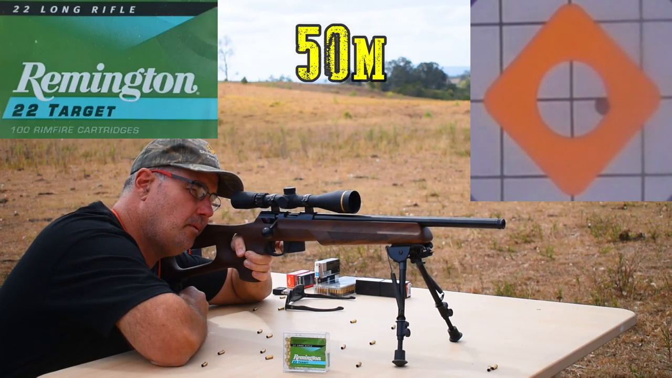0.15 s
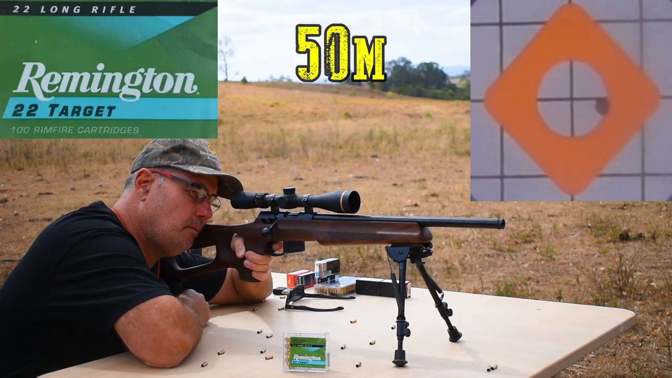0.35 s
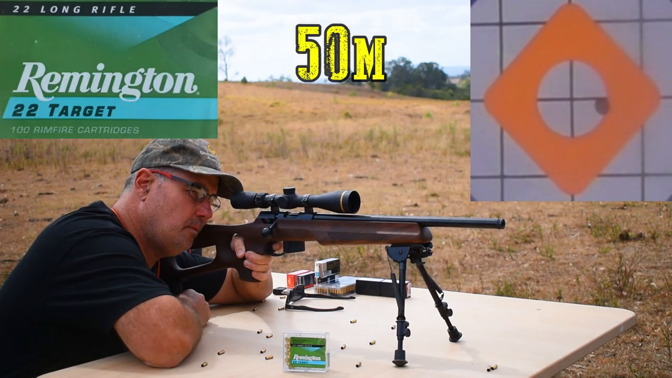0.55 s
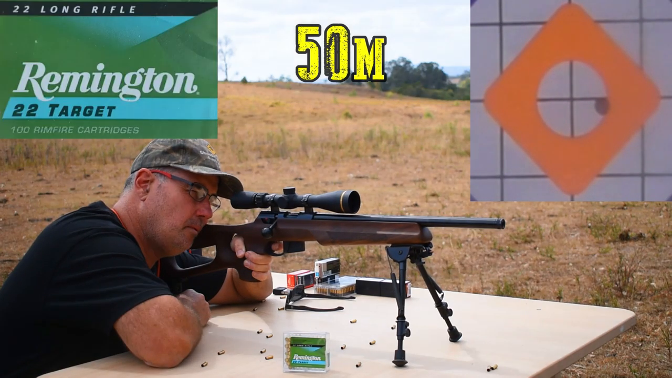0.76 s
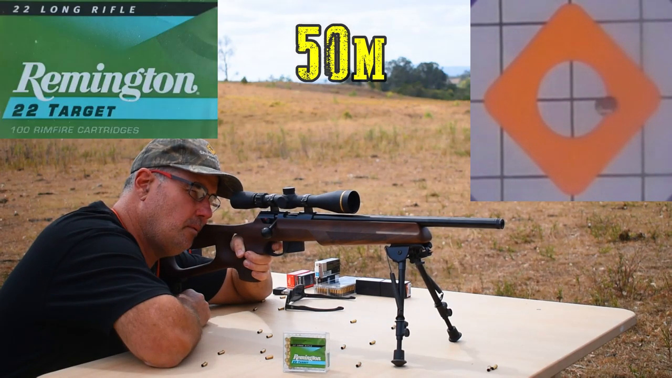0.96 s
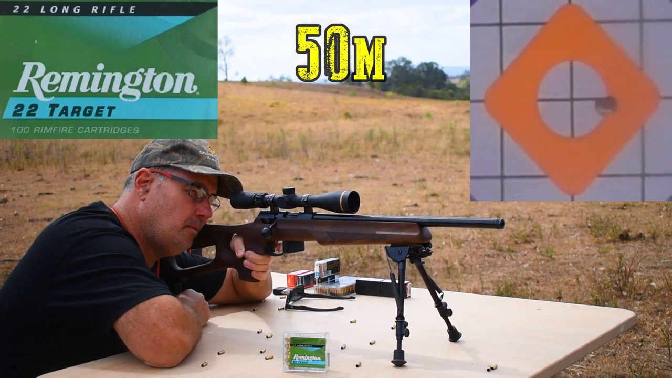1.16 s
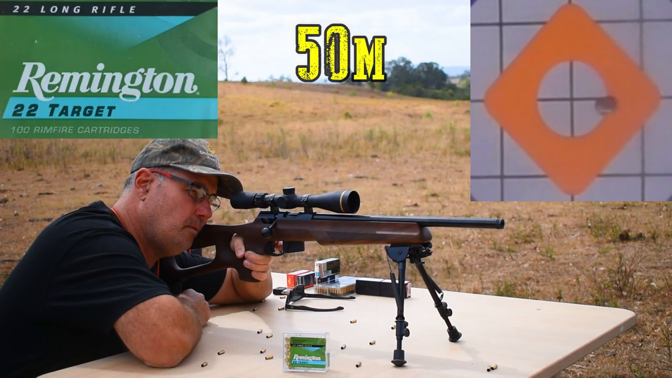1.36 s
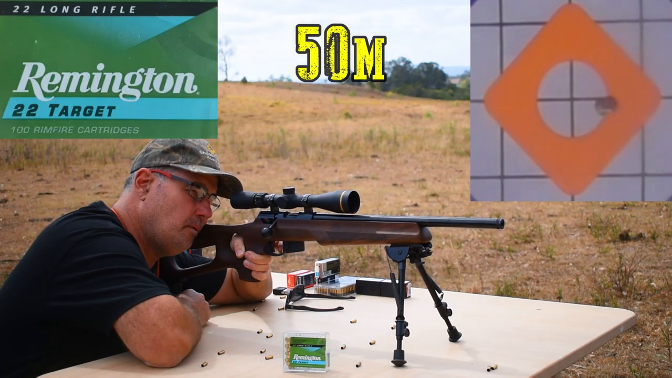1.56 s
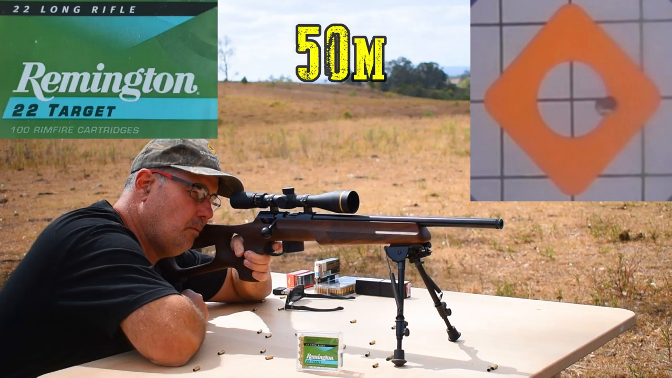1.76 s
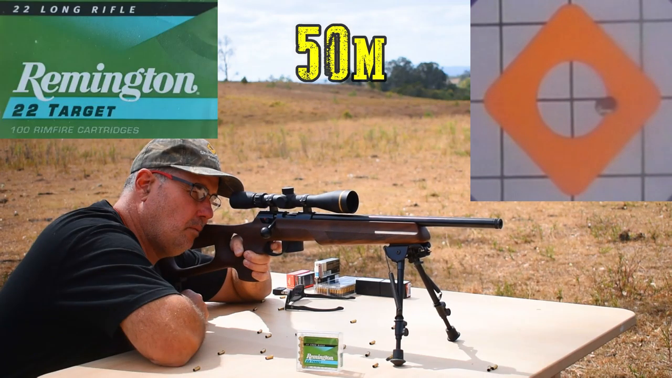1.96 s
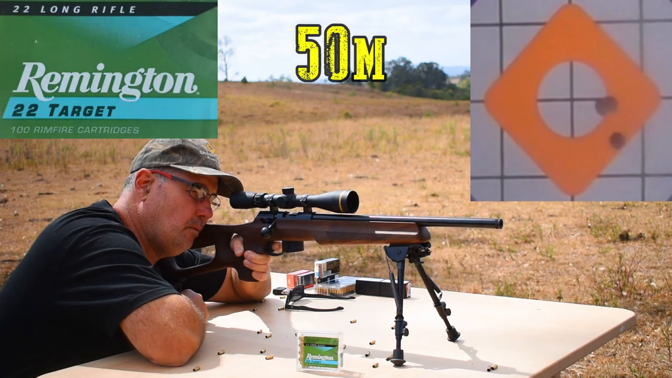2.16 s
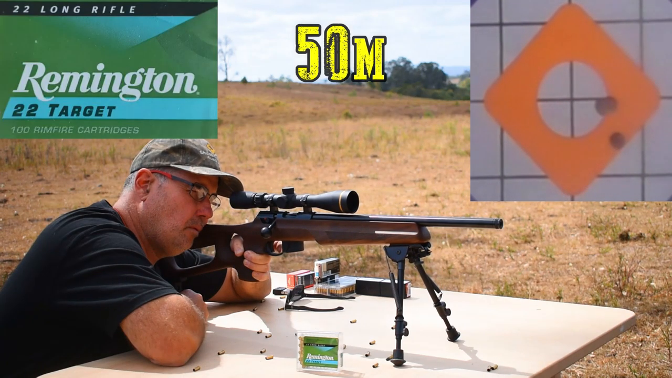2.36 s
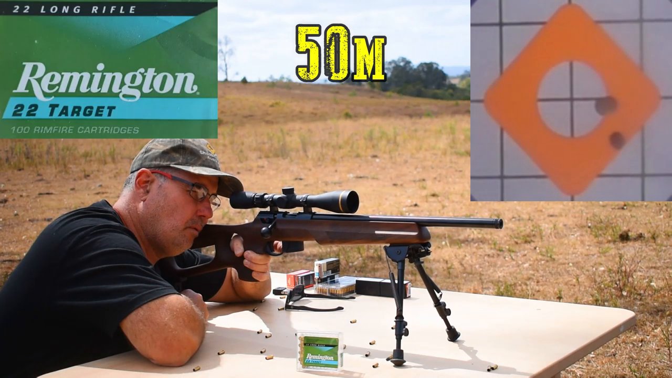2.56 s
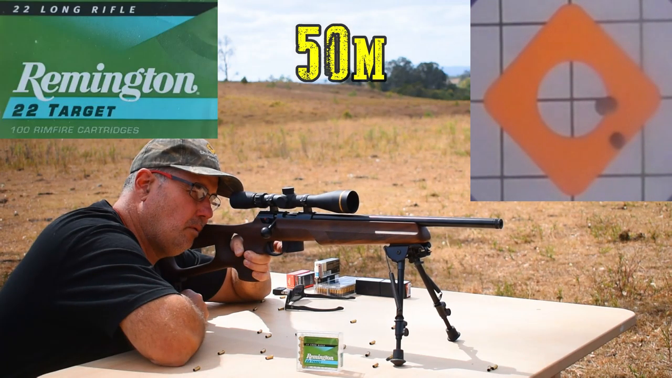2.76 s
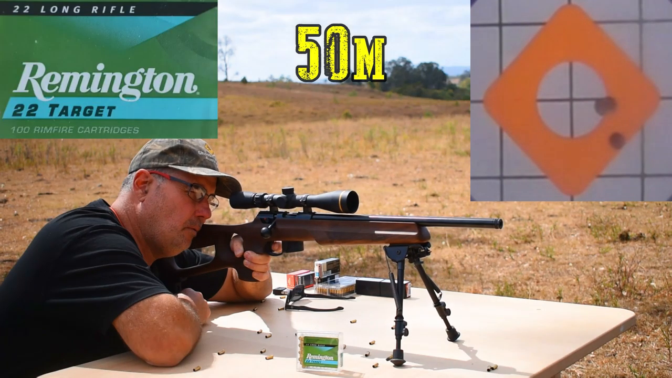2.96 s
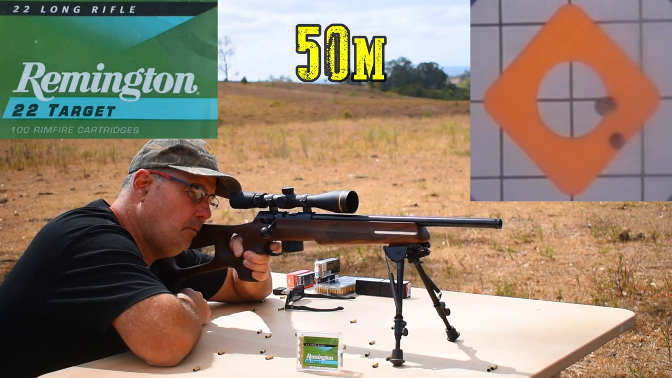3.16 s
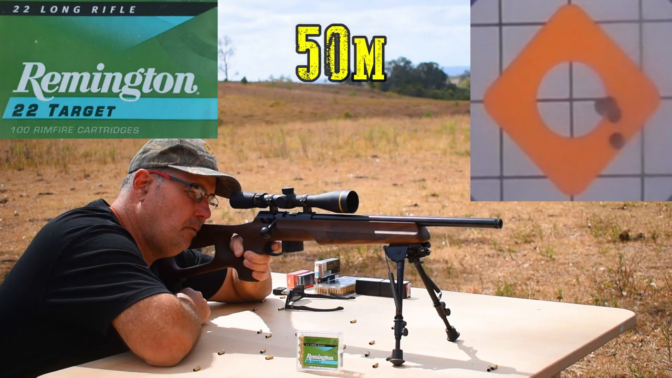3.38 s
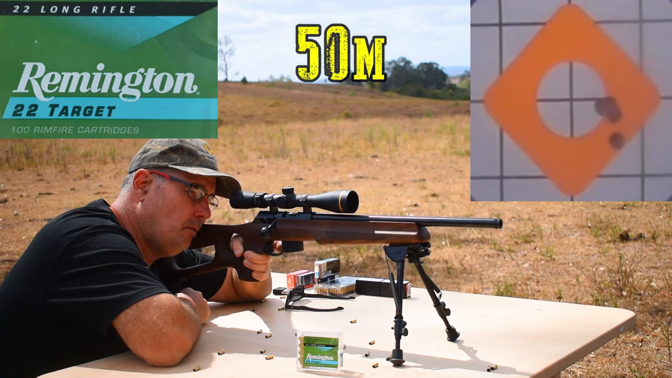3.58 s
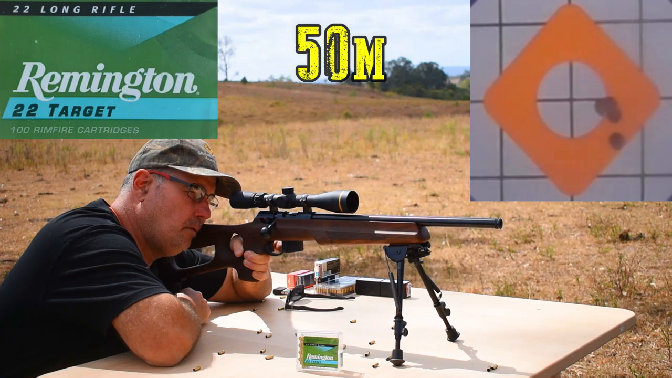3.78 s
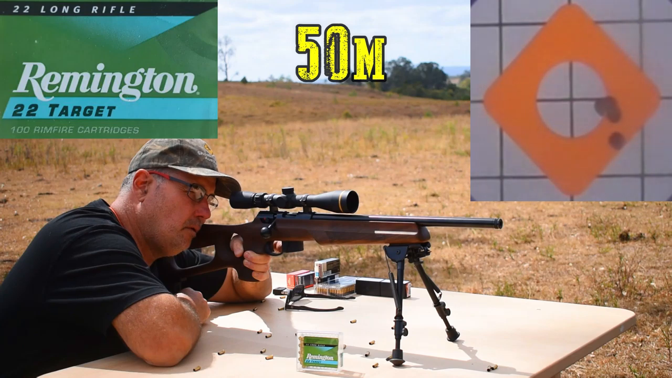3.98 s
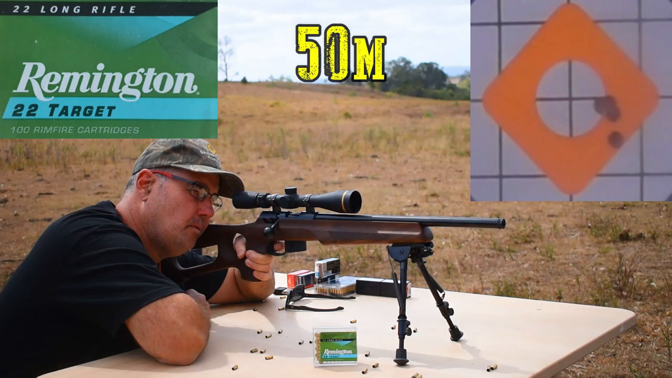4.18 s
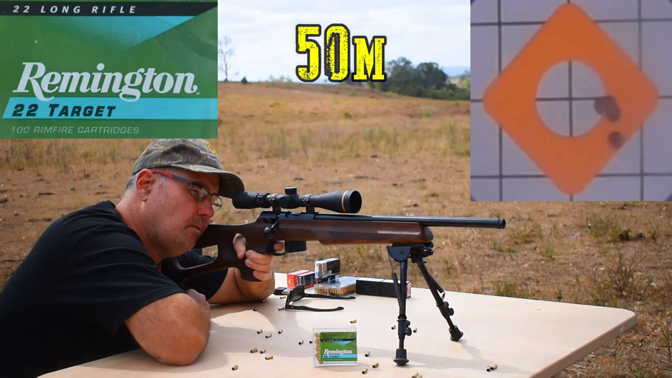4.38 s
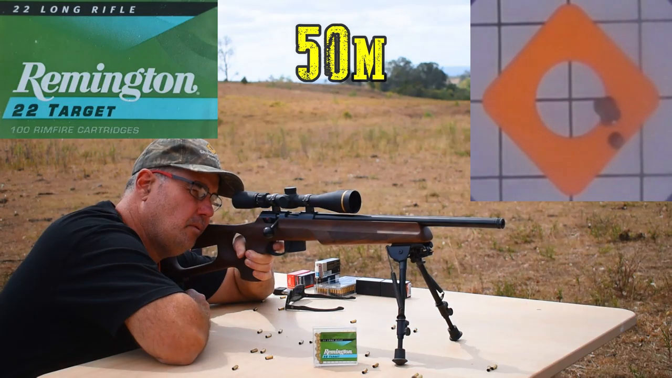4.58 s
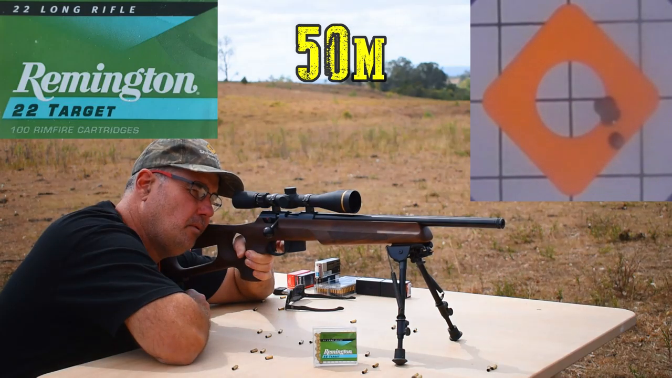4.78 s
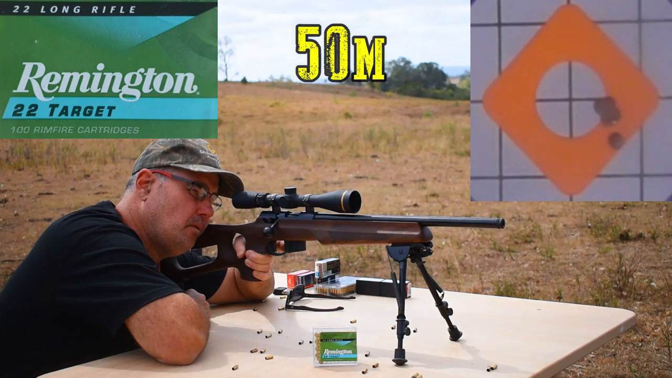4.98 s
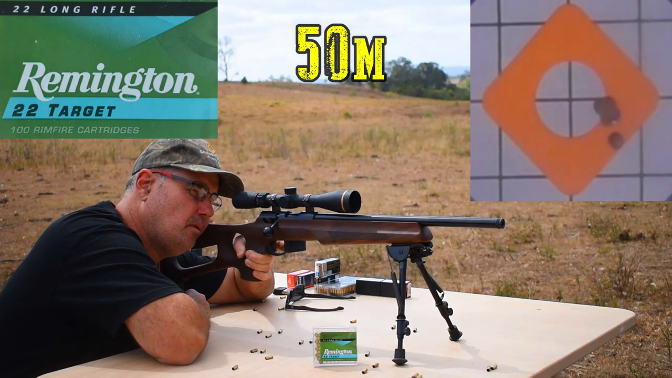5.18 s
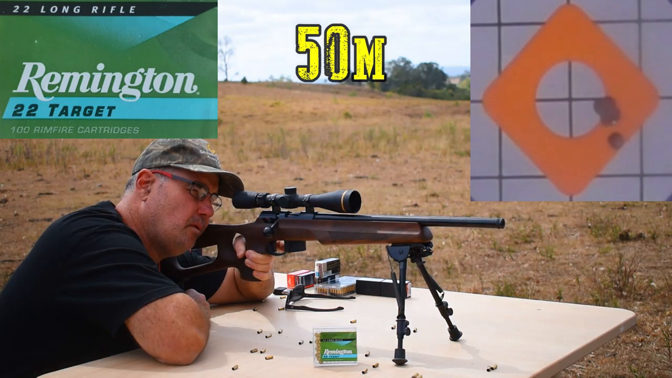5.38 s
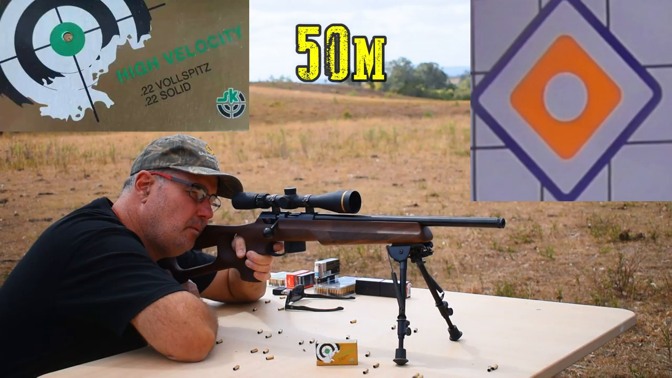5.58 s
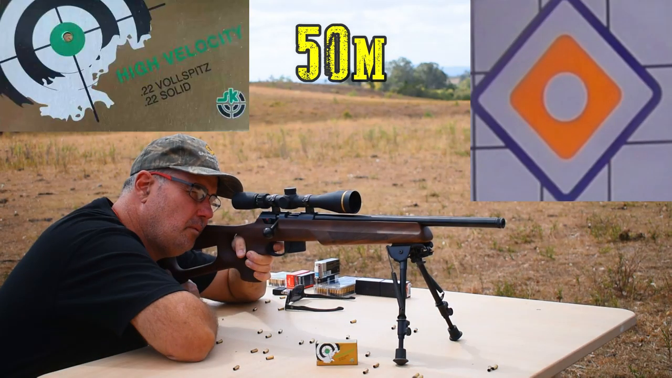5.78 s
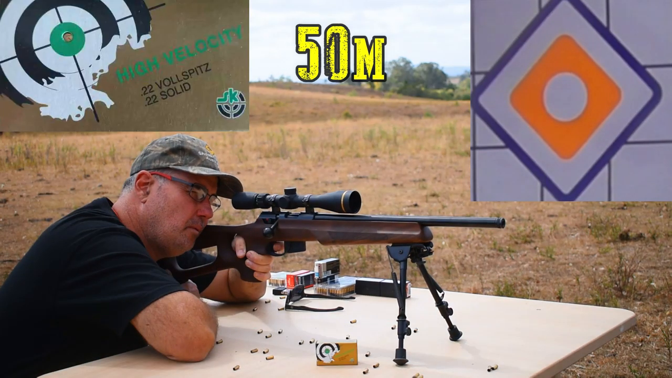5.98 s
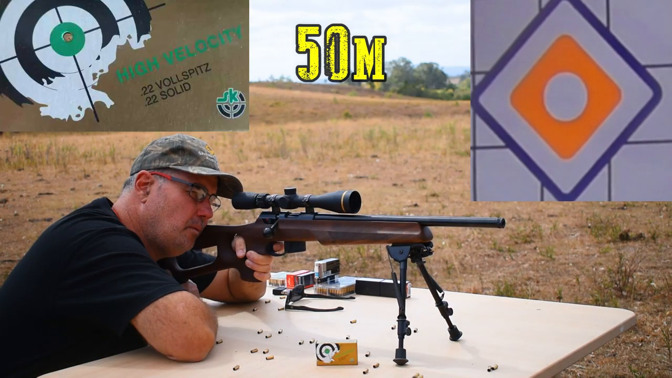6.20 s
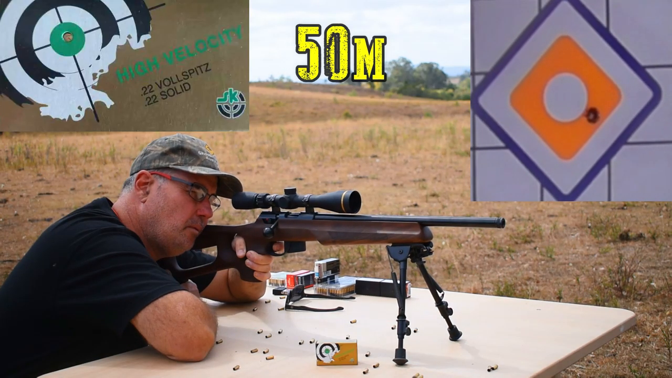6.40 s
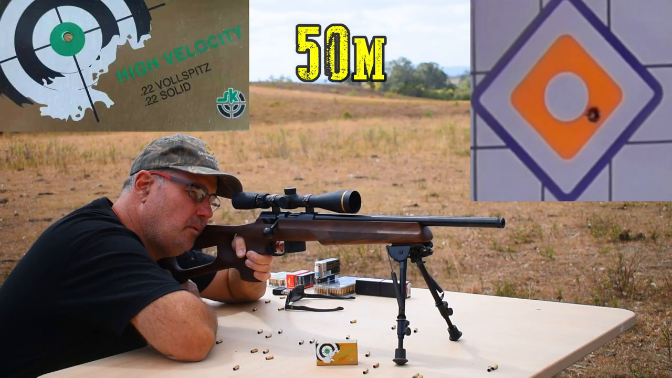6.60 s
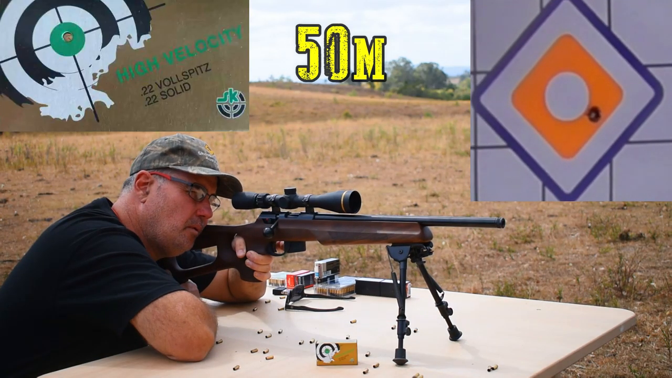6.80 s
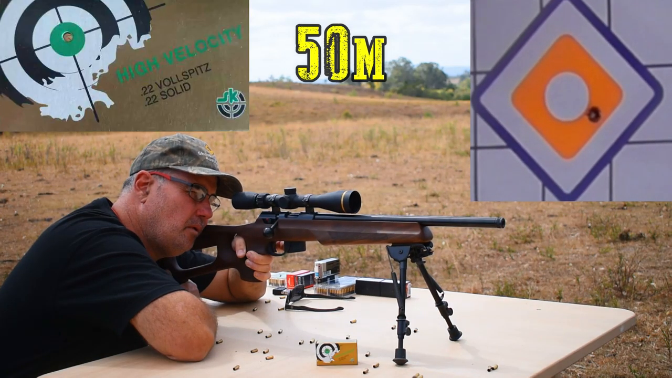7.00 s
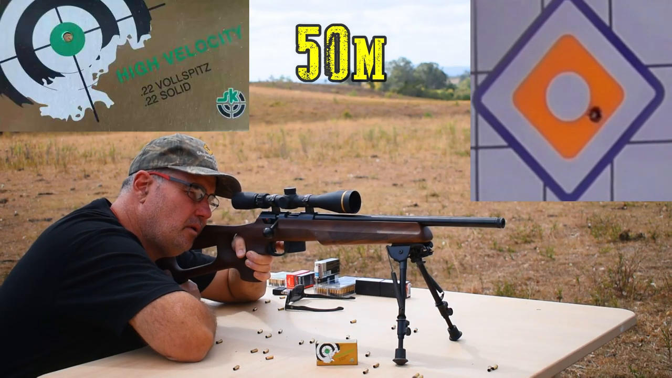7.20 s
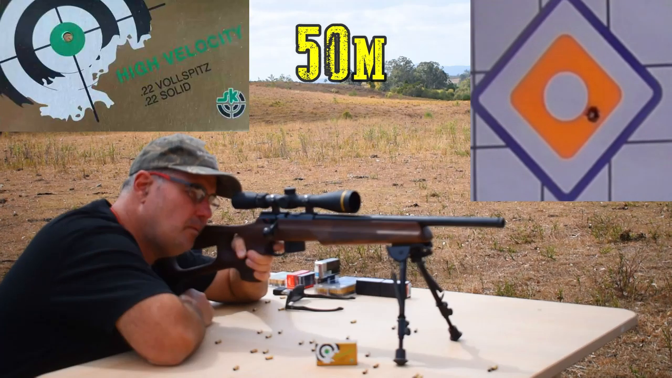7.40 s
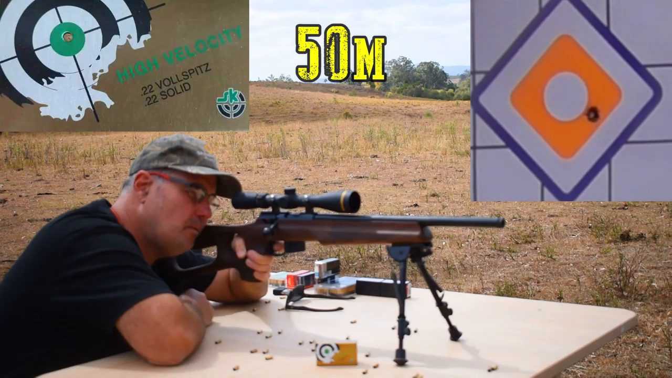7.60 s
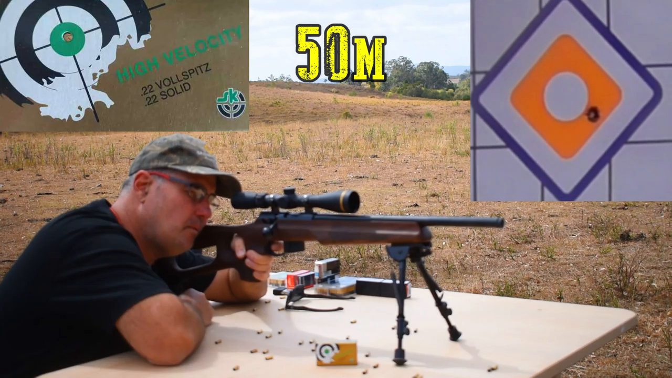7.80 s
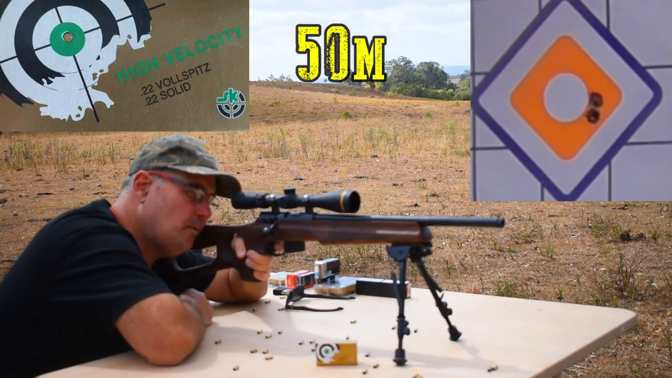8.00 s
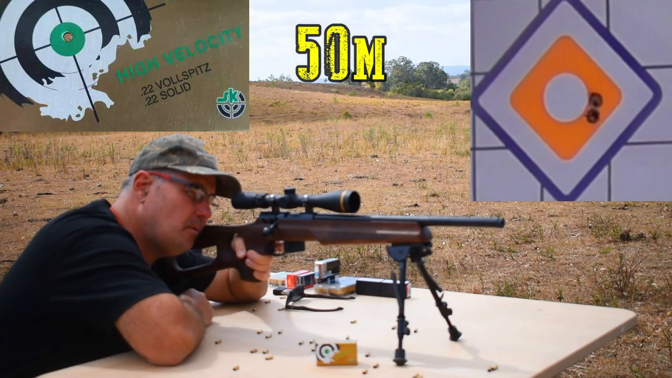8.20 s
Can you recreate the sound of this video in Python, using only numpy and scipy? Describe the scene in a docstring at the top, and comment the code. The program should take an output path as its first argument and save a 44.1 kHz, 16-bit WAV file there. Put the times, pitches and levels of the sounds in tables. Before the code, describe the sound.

Evenly spaced light rifle cracks overload a close microphone outdoors, each followed by clattering slapback from ground and banks, with near silence between.

```python
"""An open outdoor range: a small-bore rifle fires six single shots from a bench while the echo of an earlier
shot is still dying away. Each crack, a noise burst, overloads the microphone: it swings at a low pitch, a cosine
in log time, and is nearly deaf for a few hundredths of a second. Filtered noise then gives the scatter of ground,
banks and trees, and smeared pulses the hard slaps. Faint bird whistles, ticks and open-air noise lie beneath."""
import sys
import numpy as np
from scipy import signal
from scipy.io import wavfile
from scipy.ndimage import uniform_filter1d

SR = 44100
rng = np.random.default_rng(int(sys.argv[2]) if len(sys.argv) > 2 else 0)


def materialize(psi):
    """Save the field psi as 16-bit PCM at rate SR to the path in sys.argv[1].

    A 1-D psi becomes a single channel; in a 2-D psi each row is a channel.
    """
    bounded = np.clip(np.atleast_2d(psi).T, -1, 1)
    quanta = np.round(bounded * 32767).astype(np.int16)
    wavfile.write(sys.argv[1], SR, quanta)


N = 363825
T = np.arange(int(1.2 * SR)) / SR  # time after one shot, s
GROUND_START_S = 0.061  # the open ground begins to answer

# distinct hard reflections: [delay t/s, level/dB, smear t/s]
REFLECTIONS = [(0.066, -25.5, .00063), (0.0842, -20.5, .00066), (.1123, -10, .001), (.1162, -16, .001),
               (.1408, -17.5, .0008), (.1462, -7, .001), (.1627, -16, .001), (.2220, -20.5, .0012),
               (0.4877, -28, 0.00293), (0.721, -55, 0.00214), (.7855, -39.5, .0036), (0.8307, -40.5, 0.003)]
# spectrum of the report, also heard in nearby ground and ticks: [f/Hz, level/dB]
CRACK_SPECTRUM = [(60, -2.5), (200, -0.5), (350, -5), (520, 0.5), (850, -9.5), (1550, -0.5), (2400, -10.5),
                  (3500, -9.5), (6000, -17.5), (9000, -24.5), (15500, -39)]
# spectrum of a hard surface's slap before air absorption: [f/Hz, level/dB]
SLAP_SPECTRUM = [(60, -16), (400, -13.5), (900, -7), (1450, 4), (2100, -2), (3200, -19.5), (6000, -24.5),
                 (10000, -46.5), (15500, -53)]


def amp(db):
    """Level definition: decibels to amplitude ratio."""
    return 10 ** (np.asarray(db) / 20)


def read(points, hz):
    """Log-frequency interpolation: the level of a spectrum at any frequency."""
    f, db = np.transpose(points)
    return np.interp(np.log(hz + 1), np.log(f + 1), db)


def add(mix, s, sound):
    """Superposition: adds a sound to the mix at time s, trimmed at both ends of the mix."""
    start = round(s * SR)
    sound = sound[max(-start, 0):]
    part = mix[max(start, 0):][:len(sound)]
    part += sound[:len(part)]


def colour(x, points, size=4096):
    """Minimum-phase filtering: a causal filter of unit energy, its phase the Hilbert pair of its log gain."""
    hz = abs(np.fft.fftfreq(size, 1 / SR))
    log_gain = np.log(amp(read(points, hz)))
    response = np.exp(np.conj(signal.hilbert(log_gain)))
    taps = np.fft.ifft(response).real[:size // 2]
    return signal.oaconvolve(x, taps / np.linalg.norm(taps))[:len(x)]


def burst(points, smear, rough, size=2048):
    """Rough-surface reflection: a coloured pressure pulse plus a share of noise smeared in time."""
    t = np.arange(size) / SR
    smeared = rng.standard_normal(size) * (t / smear) * np.exp(-(t / smear) ** 2)
    clean = np.arange(size) == int(.5 * smear * SR)
    pulse = colour(clean + rough * smeared, points)
    # the energy of 2 ms at level 1
    return pulse / np.linalg.norm(pulse) * np.sqrt(.002 * SR)


def rifle(steady=.7, board_db=-23, deaf_db=-29, recovery=0.0005, lead=0.0013):
    """Impulse excitation: each shot wakes the same reflectors; moving air varies their echo a little."""
    # one row per shot: [t/s, crack level/dB, thump level/dB, thump duration factor, deaf time t/s,
    #  bench level/dB, echo level/dB, echo brightness/dB, backstop level/dB, far slap level/dB,
    #  ground comb spacing f/Hz, bullet flight t/s]
    shot_table = [(-.387, -12, -4, .87, .03, -4, -2.5, 2.5, 0, -33.5, 2160, 0.18),
                  (.8385, -18.5, -3.5, .92, .0245, 0, 0, 1, -3, -26, 2130, 0.16),
                  (2.014, -16.5, -5.5, 0.93, 0.035, -4, -0.95, .5, -1.5, -21.5, 2130, 0.16),
                  (3.2305, -18.5, 2, 0.98, 0.033, -1.5, 0, 1, -1.5, -23.5, 2140, .15),
                  (4.4912, -19.5, -1.5, 1.04, .038, -3.5, -0.9, 1.5, -1, -29, 2100, .15),
                  (6.3119, -17, 2.5, 1.1, 0.01356, 6, 2, 4.5, 6, -16.5, 1990, 0.15),
                  (7.8329, -18, 2.5, 1.02, 0.027, 5, 3.5, 3.5, 5, -15, 1980, 0.15)]
    # moment when each shot's echo stops short: [t/s]
    stop_times = [.39, 1.71, 2.915, 4.16, 5.46, 7.39, 8.5]
    # spectrum of the bullet's snap through the target: [f/Hz, level/dB]
    board_spectrum = [(300, -20.5), (2000, -6), (4500, 5.5), (6700, 6), (8500, -12.5), (11000, -9.5),
                      (15500, -21)]
    far_slap_s, headroom, fade_s = .3786, .66, .004

    out = np.zeros(N)
    terrain = reflectors()
    hard = slaps()
    for shot, stop in zip(shot_table, stop_times):
        (s, crack_db, thump_db, slow, deaf, bench_db, echo_db, bright_db,
         backstop_db, far_db, comb_hz, flight) = shot
        # steady is the share of echo power common to all shots
        taps = np.sqrt(steady) * terrain + np.sqrt(1 - steady) * reflectors()
        echo = amp(echo_db) * scatter(taps, bright_db, backstop_db, comb_hz)
        echo += amp(bench_db) * bench() + hard
        far_slap = burst(SLAP_SPECTRUM, smear=.0012, rough=.35)
        add(echo, far_slap_s, amp(far_db) * far_slap)
        target_snap = burst(board_spectrum, smear=0.0018, rough=1.0)
        add(echo, flight, amp(board_db) * target_snap)
        # soft saturation rounds off the loudest slaps
        echo /= (1 + (echo / headroom) ** 4) ** .25
        awake = (1 + np.tanh((T - deaf) / recovery)) / 2
        echo *= amp(deaf_db * (1 - awake))
        echo *= np.clip((stop - s - T) / fade_s, 0, 1)
        add(out, s - lead, amp(crack_db) * crack())
        add(out, s, amp(thump_db) * thump(slow) + echo)
        add(out, s + deaf, rebound())
    return out


def crack(rise_db=13, length=0.0081, onset=.001):
    """Blast noise: the report builds for a few milliseconds until the microphone blocks."""
    growth = amp(rise_db * (np.minimum(T / length, 1) - 1))
    start = 1 - np.exp(-T / onset)
    block = 1 + (T / length) ** 20
    sound = colour(rng.standard_normal(len(T)) * growth * start / block, CRACK_SPECTRUM)
    return sound / np.linalg.norm(sound) * np.sqrt(length * SR)


def thump(slow, first_peak=.0071, stretch=1.673, crest=0.012, width=0.59, db=-5.5, linger=0.073, onset=0.0071):
    """Overload recovery: the microphone swings to rest, each half swing longer than the last by stretch."""
    # slow stretches every time below; width is in natural-log units of time
    t = np.maximum(T / slow, 1 / SR)
    age = np.log(t / crest)
    main = np.exp(-(age / width) ** 2 / 2)
    late = linger * np.exp(-(age - 1) ** 2 / 0.2)
    size = (main + late) / (1 + (onset / t) ** 20)
    swing = np.cos(np.pi * np.log(t / first_peak) / np.log(stretch))
    return amp(db) * size * swing


def rebound(db=-13, swing_hz=68, decay=0.0063, onset=0.00072):
    """Damped oscillation: a smaller low swing as the microphone comes back to life."""
    envelope = np.exp(-T / decay) * (1 - np.exp(-(T / onset) ** 2))
    return amp(db) * np.cos(2 * np.pi * swing_hz * T) * envelope


def bench(db=-7.0, t60=.11, ground_db=-29, ground_t60=0.15):
    """Exponential decay: the table dies fast, the nearby ground rings on a little with more treble."""
    # spectrum of the table's reflections: [f/Hz, level/dB]
    bench_spectrum = [(60, -11.5), (190, -2), (260, -8.5), (335, -1.5), (420, -6.5), (520, 7), (640, -9),
                      (790, -4), (1100, -9), (1500, -11), (2800, -15), (5200, -18.5), (8000, -31),
                      (15500, -42.5)]
    table, near_ground = rng.standard_normal((2, len(T)))
    table = colour(table, bench_spectrum) * amp(db - 60 * T / t60)
    near_ground = colour(near_ground, CRACK_SPECTRUM) * amp(ground_db - 60 * T / ground_t60)
    return table + near_ground


def slaps(bounce=.00066, bounce_share=0.61):
    """Specular reflection: hard surfaces send back short slaps, each doubled by its bounce off the ground."""
    out = np.zeros(len(T))
    for delay, db, smear in REFLECTIONS:
        slap = burst(far(SLAP_SPECTRUM, delay), smear, rough=.2)
        slap *= amp(db) / (1 + bounce_share)
        add(out, delay, slap)
        add(out, delay + bounce, bounce_share * slap)
    return out


def far(points, delay, loss_db=30):
    """Air absorption, growing as frequency squared up to 10.5 kHz: loss_db per second of delay at 7 kHz."""
    return [(hz, db - loss_db * delay * min(hz / 7000, 1.5) ** 2) for hz, db in points]


def reflectors(lumpy_db=3, size=90):
    """Random scattering: countless small reflectors in clumps that crackle but even out over longer stretches."""
    clumps = uniform_filter1d(rng.standard_normal(len(T)), size) * np.sqrt(size)
    taps = rng.standard_normal(len(T)) * amp(lumpy_db * np.clip(clumps, -2, 2))
    return taps / np.sqrt(uniform_filter1d(taps ** 2, size=600))


def scatter(taps, bright_db, backstop_db, comb_hz, db=1.0, air_db=26, hinge_hz=2700, soil_db=5, soil_hz=650,
            comb_db=8, comb_s=0.49, comb_width=0.063, leaves_hz=2450, leaves_db=6, leaves_s=0.7, leaves_width=0.071):
    """Diffuse reflection: the range's echo, coloured by what it met and dulled by the air with distance."""
    # spectrum of the diffuse echo before these effects: [f/Hz, level/dB]
    ground_spectrum = [(80, -4.5), (270, -7.5), (450, -3.5), (570, -9.5), (720, -2), (920, -6),
                       (1400, -1.5), (2200, -4.5), (2850, -11.5), (3700, -16.5), (5600, -20.5), (7500, -29),
                       (10500, -36.5), (15500, -44.5)]
    gain, treble_db = terrain_echo(backstop_db)
    hz, t, z = signal.stft(colour(taps, ground_spectrum), SR, nperseg=256)
    hz = hz[:, None]
    shelf = (bright_db + np.interp(t, T, treble_db)) * hz ** 4 / (hz ** 4 + hinge_hz ** 4)
    # air takes the treble, soft soil the lower middle; both losses grow per second
    air_loss = air_db * np.clip((hz - 5500) / 5000, 0, 2)
    soil_loss = soil_db * np.exp(-((hz - soil_hz) / 500) ** 2)
    absorbed = t * (air_loss + soil_loss)
    # a bounce off the ground combs the return from one far bank
    comb_band = (hz > 2710) * (hz < 7050)
    comb_time = np.exp(-((t - comb_s) / comb_width) ** 2)
    comb = comb_db * np.cos(2 * np.pi * hz / comb_hz) * comb_band * comb_time
    # the tree line beyond it answers mostly in the upper middle
    leaves = leaves_db * np.exp(-((hz - leaves_hz) / 600) ** 2 - ((t - leaves_s) / leaves_width) ** 2)
    z = z * amp(shelf - absorbed + comb + leaves)
    sound = signal.istft(z, SR, nperseg=256)[1][:len(T)]
    return sound * amp(db) * gain * flutter()


def terrain_echo(backstop_db, near_s=0.031, near_db=-25, near_spread=.012, near_treble_db=-14):
    """Incoherent power addition: earth by the bench, open ground, banks and far country; gain and treble dB."""
    # earth banks and stands of trees, each a soft echo: [delay t/s, level/dB, spread t/s, treble level/dB]
    bank_table = [(0.266, -32, .018, -22), (0.357, -38, 0.004, 7.5), (0.385, -35, 0.016, -4),
                  (0.468, -47.5, 0.024, 5.5), (0.488, -38.5, 0.027, -9), (.622, -46, 0.018, -7),
                  (0.832, -48.5, 0.05, -17)]
    # the open ground is brightest where it is nearest
    ground_treble_db, extra_treble_db, bright_s = -2, 22, .026
    # the countryside beyond keeps up a faint, slowly fading wash
    distant_s, wash_db, wash_fall_db_per_s, wash_treble_db = 0.38, -56.5, 2.5, -5.5
    # rough earth round each hard surface scatters a little of its slap
    skirt_db, skirt_lag_s, skirt_spread_s, skirt_treble_db = -7, .002, .006, -7.5
    # the banks round the backstop answer each shot with their own strength
    backstop_s, backstop_spread_s = 0.31, 0.22

    distant = 1 / (1 + (distant_s / (T + 1e-6)) ** 20)
    backstop_time = np.exp(-((T - backstop_s) / backstop_spread_s) ** 2)
    backstop = amp(backstop_db * distant * backstop_time)
    nearness = np.exp(-np.maximum(T - GROUND_START_S, 0) / bright_s)
    wash = distant * amp(wash_db - wash_fall_db_per_s * (T - distant_s))
    parts = [(patch(near_s, near_db, near_spread), near_treble_db),
             (ground(), ground_treble_db + extra_treble_db * nearness),
             (wash, wash_treble_db)]
    for delay, db, spread, treble_db in bank_table:
        parts.append((backstop * patch(delay, db, spread), treble_db))
    for delay, db, _ in REFLECTIONS:
        parts.append((patch(delay + skirt_lag_s, db + skirt_db, skirt_spread_s), skirt_treble_db))
    body = sum(gain ** 2 for gain, _ in parts)
    treble = sum((gain * amp(treble_db)) ** 2 for gain, treble_db in parts)
    return np.sqrt(body), 10 * np.log10(treble / body)


def ground(peak_s=0.12, db=-21.5, rise_db_per_s=210.5, fall_db_per_s=121):
    """Exponential growth and decay: after a gap the open ground's echo swells to a peak and dies away."""
    late = T - peak_s
    gain = amp(db + np.minimum(rise_db_per_s * late, -fall_db_per_s * late))
    return gain / (1 + (GROUND_START_S / (T + 1e-6)) ** 20)


def patch(delay, db, spread):
    """Spread of path lengths: echo gain of one stretch of terrain, exponential on both sides of its delay."""
    return amp(db) * np.exp(-abs(T - delay) / spread)


def flutter(depth_db=2, size=500):
    """Sparse scattering: later echoes come from fewer, separate trees, so their level flutters more."""
    clumps = uniform_filter1d(rng.standard_normal(len(T)), size) * np.sqrt(size)
    return amp(depth_db * np.clip(clumps, -2, 2) * np.minimum(T, 1))


def handling(smear=0.00067):
    """Contact impulses: small ticks as the shooter settles on the rifle."""
    # faint handling ticks: [t/s, level/dB]
    tick_table = [(6.11, -64.5), (7.723, -56.5)]
    out = np.zeros(N)
    for s, db in tick_table:
        add(out, s, amp(db) * burst(CRACK_SPECTRUM, smear, rough=1.0))
    return out


def birds():
    """Frequency modulation: thin far whistles, sines whose phase is the running sum of a gliding pitch."""
    # whistles: [t/s, length t/s, start f/Hz, end f/Hz, level/dB]
    whistle_table = [(0.433, .06, 5550, 4700, -77), (.535, .035, 4650, 5150, -74),
                     (5.606, .12, 4430, 4470, -74.5), (5.801, 0.032, 4430, 4430, -76.5),
                     (5.865, 0.08, 4400, 4350, -76.5)]
    out = np.zeros(N)
    for s, length, start_hz, end_hz, db in whistle_table:
        hz = np.linspace(start_hz, end_hz, int(length * SR))
        tone = np.sin(2 * np.pi * np.cumsum(hz) / SR)
        add(out, s, amp(db) * signal.windows.tukey(len(hz), .5) * tone)
    return out


def outdoors(air_db=-56.5, hiss_end_s=7.39, hiss_db=-44.5, hiss_rise_db_per_s=45):
    """Stationary coloured noise: steady open air, with one soft hiss that swells and stops."""
    # spectrum of the open air: [f/Hz, level/dB]
    air_spectrum = [(20, -19), (64, -5), (108, -3.5), (250, -8.5), (400, -13.5), (560, -16), (750, -19.5),
                    (1800, -28.5), (4000, -36.5), (6000, -41), (10000, -49.5), (16000, -48.5)]
    # spectrum of the hiss: [f/Hz, level/dB]
    hiss_spectrum = [(100, -0.5), (700, -3), (1700, 3), (3000, -14), (6000, -25), (9000, -35),
                     (15000, -41.5)]
    ahead = hiss_end_s - np.arange(N) / SR
    swell = amp(hiss_db - hiss_rise_db_per_s * abs(ahead)) * (ahead > 0)
    air = amp(air_db) * colour(rng.standard_normal(N), air_spectrum)
    return air + swell * colour(rng.standard_normal(N), hiss_spectrum)


def scene():
    """Superposition: shots over the quiet of the range, as one channel."""
    return (rifle() + outdoors() + birds() + handling())[None]


def record(dry, edge_hz=15950):
    """Clipping and band limitation: full-scale limit, then a linear-phase low-pass."""
    low_pass = signal.firwin(511, edge_hz, window=("kaiser", 9), fs=SR)
    return signal.oaconvolve(np.clip(dry, -1, 1), low_pass[None], "same")


dry = scene()
out = record(dry)
materialize(out)
```